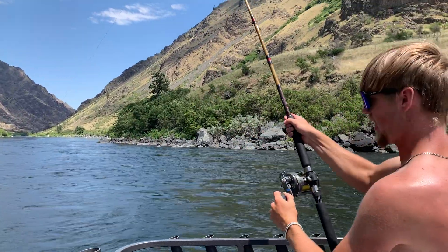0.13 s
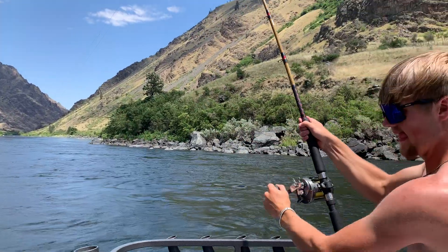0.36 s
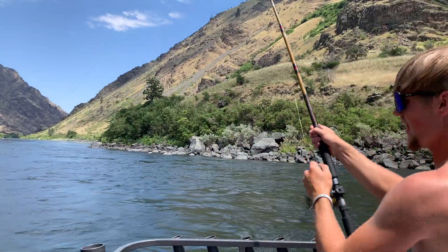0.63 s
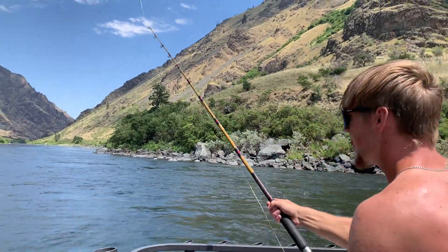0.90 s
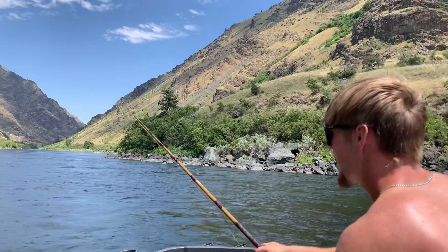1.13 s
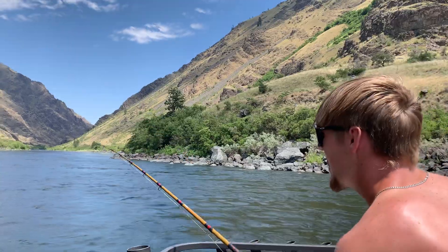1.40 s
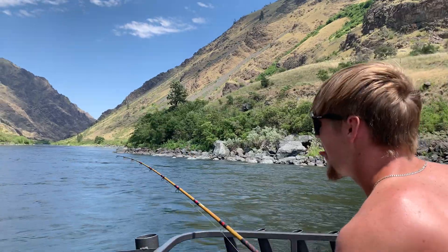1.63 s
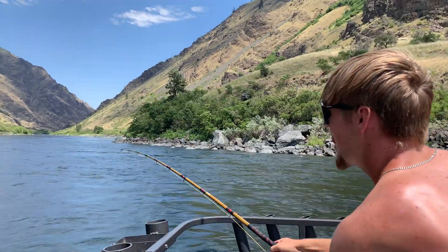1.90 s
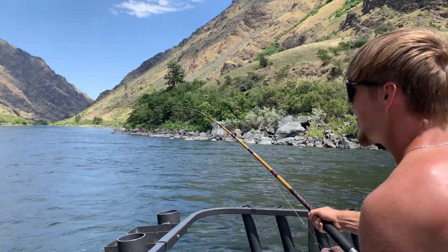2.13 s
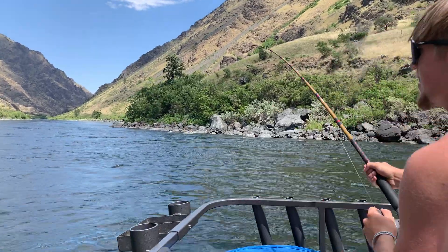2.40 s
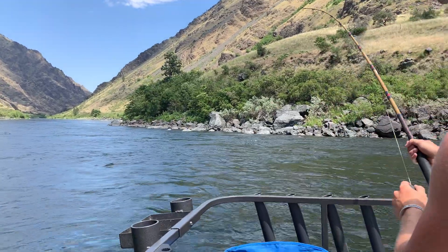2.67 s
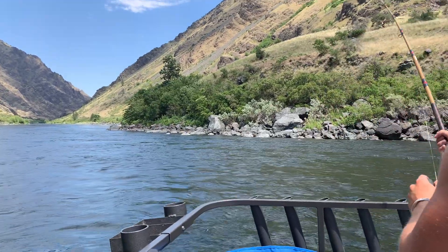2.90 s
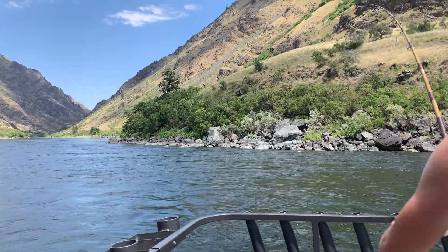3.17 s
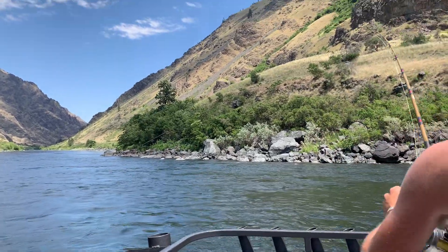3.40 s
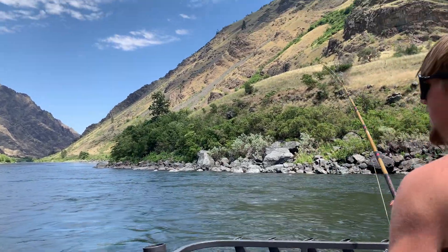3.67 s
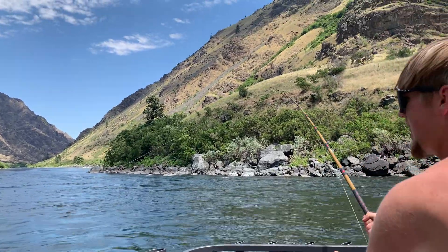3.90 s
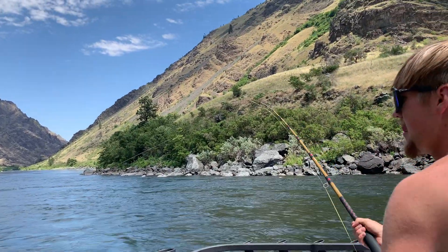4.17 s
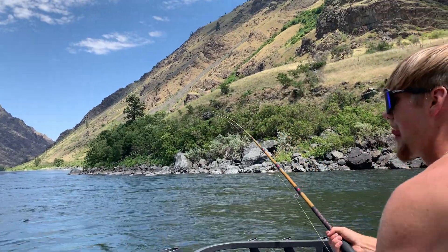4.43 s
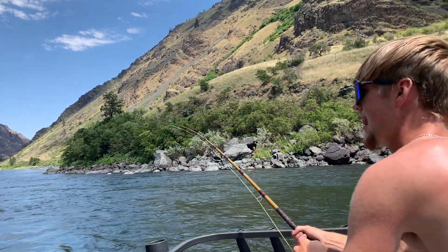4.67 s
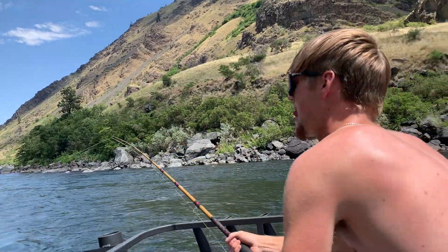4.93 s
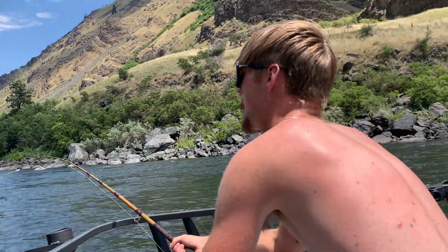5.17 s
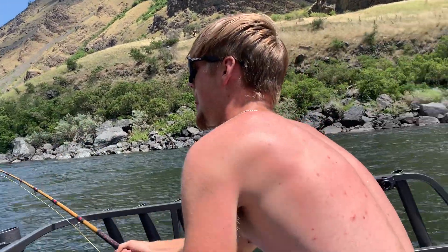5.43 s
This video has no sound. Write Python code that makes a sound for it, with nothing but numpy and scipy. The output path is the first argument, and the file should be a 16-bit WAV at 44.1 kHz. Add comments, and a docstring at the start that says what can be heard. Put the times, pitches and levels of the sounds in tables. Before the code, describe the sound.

Open boat on a breezy river, captured by a small handheld stereo microphone. A steady deep motor hum and soft water hiss lie behind rough wind flutter and thumping pops. In front, a reel ratchets as line is pulled: brief clicks first, rapid zipping bursts, a lull, then more regular purring strokes. Small watery plinks appear, and the hum drops away in the last second, leaving ratchet and wind.

```python
"""An open boat on a windy river: water and exhaust hiss from afar, and the engine hums at a steady idle, then stops.
Wind buffets the microphone ports as filtered noise and pops on them as ragged falling chirps.
A few hollow plinks sound close by, as short rising sines. Nearest, a fishing reel's drag clicker rattles in strokes
as line is pulled off the spool: each tooth drops a pawl and sets the reel ringing.
The recorder feeds one port to both channels below a sliding corner."""
import sys
import numpy as np
from scipy import signal
from scipy.fft import rfft, irfft, next_fast_len
from scipy.io import wavfile

SR = 44100
rng = np.random.default_rng(int(sys.argv[2]) if len(sys.argv) > 2 else 0)


def unload_wav(signal):
    """Save mono or channel-first audio to the path in sys.argv[1] as 16-bit WAV at rate SR, clipped to [-1, 1]."""
    wavfile.write(
        sys.argv[1],
        SR,
        np.round(np.clip(np.atleast_2d(signal).T, -1, 1) * 32767).astype(np.int16),
    )


def voltage_ratio(decibels):
    """Convert decibels (scalar or array-like) to amplitude ratios, 20 dB per decade."""
    exponent = np.asarray(decibels, float) / 20
    return 10 ** exponent


N = 245063

# colour of the low rumble, both of the exhaust and of the wind: (frequency [Hz], density [dB])
RUMBLE_COLOUR = [(20, -28), (32, -10.5), (45, -1.5), (75, 5), (125, 5.5), (180, -5), (260, -15.5),
                 (1000, -105)]


def rms_one(x):
    """Scaled to rms 1."""
    return x / np.sqrt(np.mean(x ** 2) + 1e-20)


def in_time(rows):
    """Each column of a table, after its times, as a value per sample."""
    s, *columns = np.transpose(rows)
    return [np.interp(np.arange(N) / SR, s, column) for column in columns]


def at_hz(points, hz):
    """A spectrum read on a log-frequency axis."""
    point_hz, value = np.transpose(points)
    return np.interp(np.log(hz + 1), np.log(point_hz), value)


def drift(rate_hz, channels=1):
    """Slow chance with spread 1: noise through two equal low-passes, run at a twentieth of the sample rate."""
    r = np.exp(-40 * np.pi * rate_hz / SR)
    noise = rng.standard_normal((channels, N // 20 + 4002))
    slow = signal.lfilter([1], [1, -2 * r, r * r], noise)[:, 4000:]   # the start-up is left out
    return np.array([np.interp(np.arange(N) / 20, np.arange(len(v)), rms_one(v)) for v in slow])


def ring(clicks, hz, t60):
    """A damped resonance: a unit click starts a sine of height 1 that falls 60 dB in t60 seconds."""
    r, w = voltage_ratio(-60 / (t60 * SR)), 2 * np.pi * hz / SR
    return signal.lfilter([0, np.sin(w)], [1, -2 * r * np.cos(w), r * r], clicks + 1e-18)


def coloured(x, spectrum):
    """The sound through a smooth spectrum."""
    size = next_fast_len(N)
    gain = voltage_ratio(at_hz(spectrum, np.fft.rfftfreq(size, 1 / SR)))
    return irfft(rfft(x, size) * gain, size)[..., :N]


def band(x, low_hz, high_hz):
    """A gentle band-pass."""
    return signal.sosfilt(signal.butter(1, [low_hz, high_hz], "band", fs=SR, output="sos"), x)


def bent(x, slip_s):
    """Read with a slowly slipping delay, so that the pitch wanders a little."""
    read = np.arange(N) + slip_s * SR * drift(3)[0]
    return np.array([np.interp(read, np.arange(N), v) for v in x])


def ports(takes):
    """Two takes of one source become left and right: the ports' phase lead shares them between mid and side."""
    # how far the left port leads: (frequency [Hz], phase [radians])
    lead = [(0, 0), (2150, 3.14), (3450, 6.4), (4200, 6.3), (5350, 9.42), (6400, 12.4), (6900, 11.8),
            (8000, 9.6), (8800, 9.3), (10600, 6.4), (11300, 6.15), (13100, 3.3), (13800, 3.0), (15500, .1),
            (17000, 0)]
    # how alike the ports hear: (frequency [Hz], left-right likeness [0 to 1])
    likeness = [(300, .6), (2000, .8), (6000, .6), (7500, .9), (8200, .993), (9000, .99), (11000, .9),
                (12800, .99), (14000, .99), (15500, .9)]
    # how much stronger the left port hears: (frequency [Hz], left over right [dB])
    lean = [(500, -2.5), (1170, 6.5), (4200, -4), (6400, -3.5), (8000, 0)]
    size = next_fast_len(N)
    hz = np.fft.rfftfreq(size, 1 / SR)
    same, other = rfft(takes, size)
    alike, half_lead = at_hz(likeness, hz), np.interp(hz, *np.transpose(lead)) / 2
    near = np.sqrt((1 + alike) / 2) * same
    apart = np.sqrt((1 - alike) / 2) * other
    mid = np.cos(half_lead) * near + 1j * np.sin(half_lead) * apart
    side = 1j * np.sin(half_lead) * near + np.cos(half_lead) * apart
    left_gain = voltage_ratio(at_hz(lean, hz) / 2)
    return irfft([(mid + side) * left_gain, (mid - side) / left_gain], size)[:, :N]


def river(flicker_db):
    """Far water and exhaust: smooth coloured hiss whose level flickers slightly."""
    # colour of the hiss: (frequency [Hz], density [dB])
    hiss_colour = [(400, -14), (900, -5), (1800, -5), (2800, -9), (5500, -14), (9000, -17), (11000, -21),
                   (16000, -25)]
    level_db = -37 + flicker_db * drift(8)
    return voltage_ratio(level_db) * rms_one(coloured(rng.standard_normal((2, N)), hiss_colour))


def engine(waver_db, wander):
    """Three orders of the firing rate, wavering a little, over a rough rumble; all die away once it is cut."""
    # the right port hears each order weaker and shifted: (multiple of the firing rate, level [dB], lag [radians])
    right_port = [(1, -6, -.45), (2, -6, -2.2), (3, -3, 2.7)]
    firing_hz, cut_s, dying_db_per_s = 69.26, 4.62, -110
    orders_db, churn_db = [-13.5, -17, -31.5], -16.5   # rms at the left port before the cut
    dying_db = dying_db_per_s * np.maximum(np.arange(N) / SR - cut_s, 0)
    phase = 2 * np.pi * firing_hz * np.cumsum(1 + wander * drift(0.8)[0]) / SR
    churn = rms_one(coloured(rng.standard_normal((2, N)), RUMBLE_COLOUR))   # exhaust churning under water
    out = voltage_ratio(churn_db + dying_db) * churn
    for (order, right_db, lag), level_db in zip(right_port, orders_db):
        height = np.sqrt(2) * voltage_ratio(level_db + dying_db + waver_db * drift(1.0)[0])
        left = np.sin(round(order) * phase)
        right = voltage_ratio(right_db) * np.sin(round(order) * phase - lag)
        out += height * [left, right]
    return out


def wind(gusts_db, eddies_per_s, eddy_db, shared):
    """Mostly own noise at each port: a lumpy rumble, a gusty flutter and small eddies that burst."""
    # gusts, each column relative to its own level:
    # (time [s], flutter [dB], sharpness over flutter [dB], low buffeting [dB])
    gust_course = [(0, -27, 5, 1), (.6, -28, -1, -4.5), (1.3, -31, 4, -1), (1.6, -29.5, 7.5, -0.5),
                   (1.9, -24.5, 2, 1.5), (2.2, -27.5, 3.5, -3), (2.6, -24.5, 2.5, 3),
                   (3.1, -25, -0.5, -1.5), (3.27, -29, 5.5, -7), (3.45, -33.5, 9.5, 0),
                   (3.9, -32.5, 7.5, -1.5), (4.3, -30, -5, -1.5), (4.5, -29.5, 12, 1),
                   (4.62, -27, -0.5, -2.5), (4.76, -32.5, 9, 1), (4.82, -31, 10.5, -5),
                   (5.08, -34.5, -13, -2.5), (5.14, -33, -2, 2), (5.25, -36.5, 4, -0.5),
                   (5.46, -24, -34, 3.5), (5.56, -24.5, -23, -2)]
    # colour of the flutter: (frequency [Hz], density [dB])
    flutter_colour = [(120, -54), (200, 2), (320, 0), (500, -5.5), (800, -18.5), (1300, -28), (2200, -32),
                      (8000, -45.5)]
    gust_db, sharp_db, buffet_db = in_time(gust_course)
    rumble = rms_one(coloured(rng.standard_normal((2, N)), RUMBLE_COLOUR))
    rumble = rumble * voltage_ratio(2.1 * drift(14.0, channels=2))

    swing = np.minimum(drift(27.0, channels=2) + 0.5 * drift(7.9), 1.7)
    steady = rng.standard_normal((2, N)) * voltage_ratio(gusts_db * swing)
    starts = rng.random((2, N)) < eddies_per_s / SR
    eddies = starts * voltage_ratio(eddy_db + 2.1 * np.minimum(rng.exponential(1, (2, N)), 2.2))
    bursts = signal.lfilter([1], [1, -.99], eddies) * rng.standard_normal((2, N))   # each dies in a few ms
    flutter = rms_one(coloured(steady + bursts, flutter_colour))
    torn = band(band(flutter, 670, 3050), 670, 3050)   # air tearing over the port's edge
    flutter = flutter + voltage_ratio(sharp_db) * torn

    left, own = voltage_ratio(buffet_db - 15.5) * rumble + voltage_ratio(gust_db + 3.5) * flutter
    return np.array([left, shared * left + np.sqrt(1 - shared ** 2) * own])


def pops(fall, settle, puff_db, other_db):
    """A pop of air on the ports is a quick, ragged chirp falling in pitch, with torn air on top and a rough wake."""
    # pops: (time [s], relative level [dB], pitch scale near the start [Hz], time to the top of the swell [s])
    pop_list = [(0.278, -4, 860, 0.0032), (0.357, -13, 987, 0.0047), (0.501, -7.5, 595, 0.0038),
                (0.541, -4.5, 1150, 0.0039), (0.692, -14.5, 1334, 0.0028), (0.849, -11, 1540, 0.0032),
                (0.875, -17, 920, 0.0042), (0.909, -11, 3100, 0.0034), (1.294, -9.5, 1000, 0.0038),
                (1.361, -16, 1025, 0.004), (1.816, -4, 400, 0.0055), (1.873, -9, 900, 0.004),
                (2.127, -8, 485, 0.0052), (2.311, -11.5, 810, 0.0035), (2.358, -11, 1100, 0.0038),
                (2.642, -6.5, 746, 0.004), (2.706, -12.5, 690, 0.0041), (2.716, -9, 1074, 0.0037),
                (2.724, -16, 800, 0.0041), (2.94, -7.5, 924, 0.0065), (2.956, -28, 705, 0.0031),
                (3.006, -11.5, 1720, 0.0025), (3.048, -11, 800, 0.0027), (3.061, -7.5, 884, 0.0033),
                (3.324, -11.5, 602, 0.0041), (4.473, -18, 900, 0.0039), (4.487, -21.5, 2160, .004),
                (4.531, -20, 680, 0.0047), (4.573, -12, 1850, 0.0025), (4.597, -15, 640, 0.0076),
                (5.471, -16, 600, 0.0044)]
    wake_db, wake_s = -18.5, 0.041   # the wake against its pop, and its time to the top
    out, luck = np.zeros((2, N)), rng.random((len(pop_list), 3))
    t = np.arange(round(.085 * SR)) / SR
    for (s, level_db, start_hz, swell_s), turn in zip(pop_list, luck):
        fall_s = fall * swell_s
        pitch_hz = start_hz * (np.exp(-t / fall_s) + settle)
        turns = start_hz * (fall_s * (1 - np.exp(-t / fall_s)) + settle * t)   # the pitch summed over time
        swell = voltage_ratio(level_db + 2.0) * (t / swell_s * np.exp(1 - t / swell_s)) ** 1.26
        swell = swell / np.hypot(1, pitch_hz / 600)   # weightier as it falls
        ragged = 1 + 0.55 * np.sin(2 * np.pi * ((110 + 120 * turn[1]) * t + turn[0]))   # the swell stutters
        chirp = ragged * np.cos(2 * np.pi * (turns + turn[:2, None]))
        puff = voltage_ratio(puff_db) * band(rng.standard_normal((2, len(t))), 0.48 * start_hz, 0.81 * start_hz)

        # churned air trails the pop
        wake = voltage_ratio(level_db + wake_db) * t / wake_s * np.exp(1 - t / wake_s)
        wake = wake * (1 + np.sin(2 * np.pi * (45 * t + turn[2])))
        churned = band(rng.standard_normal((2, len(t))), 220, 300 + 0.41 * start_hz)
        at = round(s * SR) + np.arange(len(t))
        out[:, at] += wake * churned + voltage_ratio([[0], [other_db]]) * swell * (chirp + puff)
    return out


def plinks(rise_per_s):
    """A pocket of air sings briefly, rising a little: a swelling sine, perhaps water slapping the hull."""
    # short hollow plinks: (time [s], peak [dB], starting pitch [Hz], time to the top [s])
    plink_list = [(.174, -23, 1710, 0.0028), (.205, -23, 940, 0.0053), (0.514, -23, 1390, 0.0033),
                  (.62, -31.5, 1170, 0.0041), (2.928, -30, 1110, 0.0029), (3.086, -28, 1610, 0.0021),
                  (3.265, -23, 885, 0.0038), (4.56, -26, 880, .006), (4.6, -21, 450, 0.0094),
                  (4.635, -22, 452, 0.013), (4.755, -29, 775, 0.0053), (4.83, -31, 690, 0.0066)]
    out, t = np.zeros(N), np.arange(round(.06 * SR)) / SR
    for s, peak_db, hz, swell_s in plink_list:
        swell = voltage_ratio(peak_db) * (t / swell_s * np.exp(1 - t / swell_s)) ** 2
        at = round(s * SR) + np.arange(len(t))
        out[at] += swell * np.sin(2 * np.pi * hz * t * (1 + rise_per_s * t))
    return out


def teeth():
    """Time and relative dB of each tooth: every pull speeds up from a slow start, peaks and slows."""
    # pulls of line off the spool: (first click [s], last click [s], teeth passed,
    # share of the pull at which it is fastest, level at the easy rate [dB])
    pulls = [(0.299, 0.367, 7.5, 0.25, -13.5), (0.481, 0.561, 9.2, 0.81, -11.5),
             (0.634, 0.842, 28.6, 0.84, -15), (0.994, 1.178, 43, 0.97, -14.5),
             (1.211, 1.374, 34.3, 0.8, -15), (1.42, 1.588, 40.6, 0.6, -15), (1.602, 1.782, 36, 0.66, -15.5),
             (1.819, 1.994, 42.4, 0.42, -16.5), (2.043, 2.181, 22.2, 0.36, -13.5),
             (3.037, 3.385, 60.5, 0.93, -19.5), (3.486, 3.736, 49, 0.71, -17.5),
             (3.791, 4.035, 38, 0.72, -16), (4.08, 4.357, 43.6, 0.69, -16), (4.395, 4.65, 48, 0.62, -15.5),
             (4.667, 4.935, 40.5, 0.44, -13.5), (4.988, 5.215, 36.5, 0.51, -14.5),
             (5.272, 5.556, 45.5, 0.44, -14)]
    # teeth timed one by one, single clicks and slow starts and ends of pulls: (time [s], level [dB])
    single_teeth = [(.384, -12), (.409, -9), (.459, -10.5), (.575, -10), (.6, -12), (.954, -7.5),
                    (.968, -12.5), (.981, -6.5), (1.196, -13), (1.389, -9.5), (2.024, -22), (2.199, -10.5),
                    (2.22, -11), (2.241, -11.5), (2.262, -13.5), (2.295, -11), (2.42, -11.5), (2.519, -20),
                    (2.588, -19), (2.603, -17), (2.697, -23), (2.77, -22), (3.47, -15), (4.056, -17),
                    (4.376, -13), (4.955, -9.5), (5.24, -12)]
    start_speed, end_speed = .42, 0.6   # shares of a pull's top speed
    speed_bend = 0.39                   # power; lower stays longer near the top
    catch_s = .0125                     # the first tooth hangs this long before the spool runs
    # the pawl drops less far at speed: dB per doubling of the rate, about an easy rate
    shallower_db, easy_teeth_per_s = -1.5, 162
    along, rows = np.linspace(0, 1, 200), list(single_teeth)
    for first, last, count, fastest, level_db in pulls:
        speed = np.interp(along, [0, np.clip(fastest, .05, .95), 1], [0, 1, 0]) ** speed_bend
        edge = np.where(along < fastest, start_speed, end_speed)
        turned = np.cumsum(edge + (1 - edge) * speed)
        run = np.interp(np.linspace(turned[0], turned[-1], round(count)), turned, along)   # equal turns per tooth
        at = np.append(first, first + catch_s + (last - first - catch_s) * run)
        rate = 1 / np.gradient(at)
        rows += zip(at, level_db + shallower_db * np.log2(rate / easy_teeth_per_s))
    return np.transpose(sorted(rows))


def pawl_contacts(uneven_db, jitter):
    """Each tooth drops the pawl, which lands and rebounds: one row of impulses per contact."""
    # landing and rebounds: (delay [s], relative level [dB])
    rebounds = [(0, 1), (.0045, -5.5), (.009, -17)]
    at, tooth_db = teeth()
    luck = rng.standard_normal((len(at), 2 * len(rebounds)))
    gap = np.minimum(np.gradient(at), .01)
    contacts = np.zeros((len(rebounds), N))
    for k, (delay, rebound_db) in enumerate(rebounds):
        late = np.minimum(delay, gap * .5 * k)   # close teeth bring the rebounds forward
        late = late + jitter * gap * luck[:, 2 * k]
        size = voltage_ratio(tooth_db + rebound_db + uneven_db * np.clip(luck[:, 2 * k + 1], -1, 2))
        np.add.at(contacts[k], np.clip((at + late) * SR, 0, N - 1).astype(int), size)
    return contacts


def reel(snap_s, rattle_s, rattle_db, uneven_db, jitter):
    """Each contact snaps and rattles as noise ringing in the reel; the first landing of each tooth also pings."""
    # broad colour of a click: (frequency [Hz], density [dB])
    click_colour = [(1200, -9), (2200, -6), (3500, -9.5), (5000, -8.5), (5700, -8.5), (7000, -4.5),
                    (8000, -1.5), (10500, -5), (12500, -3), (14000, -8.5), (16000, -7)]
    # what the reel rings with: (frequency [Hz], relative level [dB], t60 [s], face that sends it out best)
    reel_modes = [(1720, -28, 0.022, 0), (2590, -29, 0.035, .6), (2970, -26, 0.03, 0),
                  (3190, -27, 0.03, .2), (3390, -28, 0.028, .35), (4050, -26, 0.033, 1),
                  (4580, -28, 0.022, 1.4), (5050, -30, 0.03, 2.2), (7090, -29, .025, 1.3),
                  (7450, -30, .025, 2.3)]
    # the pawl's own short ping: (frequency [Hz], relative level [dB], t60 [s])
    pawl_modes = [(6800, -4, 0.009), (7300, -8, .005), (11200, -12, 0.003)]
    # as the rod swings, another face of the reel turns to the microphone:
    # (time [s], face [about 0 dull to 2 bright], relative face level [dB], pawl level [dB])
    facing = [(.3, -0.2, -16, -31), (.55, 1.3, -1, -27), (.78, 1.2, 3.5, 1), (.96, 3, 3, -1.5),
              (1.05, 2, 5, -3), (1.14, 2.1, 3, -15), (1.24, 1.3, 1.5, -14), (1.35, 2.5, 6, 2.5),
              (1.52, 1.2, 0.5, -34), (1.72, 1.6, -1.5, 0.5), (1.92, 1.5, 1, -29), (2.12, 1.9, 0, -13),
              (3.25, 1.2, 3.5, -27), (3.65, 1.5, 6, -50), (3.93, 0.66, 0.5, -30), (4.24, 0.6, 0, -39),
              (4.54, 1.1, 3.5, -16), (4.8, 0.6, -9, -20), (5.02, -0.5, 3, -10), (5.16, -0.5, 5.5, -10),
              (5.24, -0.5, 4, -22), (5.4, 1.5, -14, -21)]
    # the band each face sends out, from face -1 up: (low [Hz], high [Hz])
    face_bands = [(1450, 1470), (2750, 3200), (3750, 4700), (4450, 5500)]
    off_face_db, off_mode_db = -6.5, -3   # loss of a band and of a mode one face away
    mode_slip_s = .0005   # bends each mode by about one percent

    contacts = pawl_contacts(uneven_db, jitter)
    clicks = contacts.sum(axis=0)
    snap = signal.lfilter([1], [1, -np.exp(-1 / (snap_s * SR))], clicks)
    rattle = voltage_ratio(rattle_db) * signal.lfilter([1], [1, -np.exp(-1 / (rattle_s * SR))], clicks)
    knock, shake = (snap + rattle) * rng.standard_normal((2, 2, N))

    face, face_db, pawl_db = in_time(facing)
    body = np.zeros((2, N))
    for hz, level_db, t60, best in reel_modes:
        # each mode's level and pitch also wander slowly at random
        turned_db = 0.32 * face_db + off_mode_db * np.minimum((face - best) ** 2, 2)
        mode_db = level_db - 13.0 + turned_db + 5.0 * drift(5.4)
        body += voltage_ratio(mode_db) * bent(ring(shake, hz, t60), mode_slip_s)
    faces = np.zeros((2, N))
    for k, edges in enumerate(face_bands, start=-1):
        band_db = face_db - 3.5 + off_face_db * (face - k) ** 2
        faces += voltage_ratio(band_db) * band(band(shake, *edges), *edges)
    ping = sum(voltage_ratio(level_db) * ring(contacts[0], hz, t60) for hz, level_db, t60 in pawl_modes)
    return voltage_ratio(-4.0) * (coloured(knock, click_colour) + body + faces) + voltage_ratio(pawl_db) * ping


def scene():
    """River, reel, pops and plinks pass the port pair; hum and wind reach each port in their own way."""
    far = river(flicker_db=.6)
    hum = engine(waver_db=.8, wander=.002)
    gusts = wind(gusts_db=4.5, eddies_per_s=24, eddy_db=-9, shared=0.15)
    puffs = pops(fall=0.894, settle=0.146, puff_db=-6.5, other_db=-4.0) + plinks(rise_per_s=3.0)
    clicker = reel(snap_s=0.00049, rattle_s=0.0045, rattle_db=-7.0, uneven_db=0.66, jitter=0.057)
    return ports(clicker + far + puffs) + gusts + hum


def roll_off(x):
    """The treble ends steeply here."""
    return signal.sosfilt(signal.butter(12, 17030, fs=SR, output="sos"), x)


def record(dry):
    """The recorder puts the left port on both channels in the bass, rounds the peaks and cuts the top."""
    # below this corner both channels carry the left port: (time [s], corner [Hz])
    mono_corner = [(0, 650), (1.0, 525), (2.5, 148), (3.4, 24.95), (4.3, 22.2), (4.45, 257.3), (5.56, 329)]
    left, right = dry
    hz, s, apart = signal.stft(right - left, SR, nperseg=4096)
    corner_s, corner_hz = np.transpose(mono_corner)
    corner = np.exp(np.interp(s, corner_s, np.log(corner_hz)))
    passed = 1 / (1 + (corner / (hz[:, None] + 1)) ** 12)
    kept_apart = signal.istft(apart * passed, SR, nperseg=4096)[1][:N]
    x = np.array([left, left + kept_apart])
    rounded = 1.05 * np.tanh(x / 1.05)
    top_cut = signal.ellip(10, .5, 36, 15750, fs=SR, output="sos")
    return roll_off(signal.sosfilt(top_cut, rounded))


dry = scene()
out = record(dry)
unload_wav(out)
```